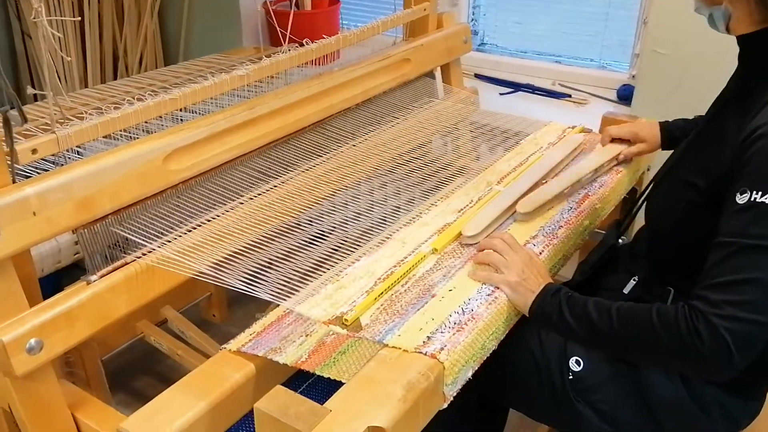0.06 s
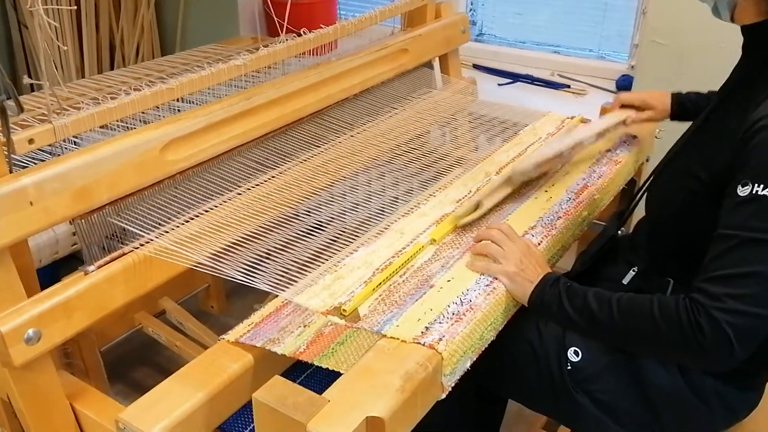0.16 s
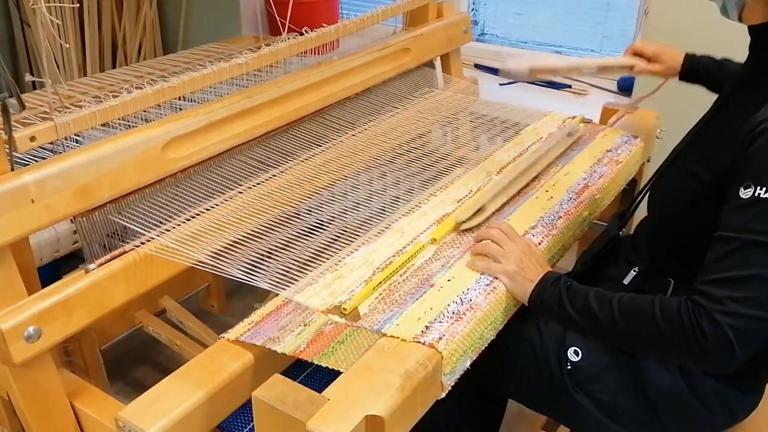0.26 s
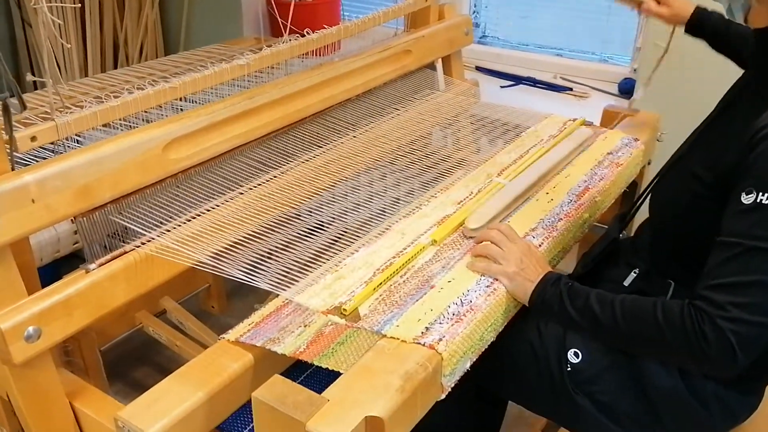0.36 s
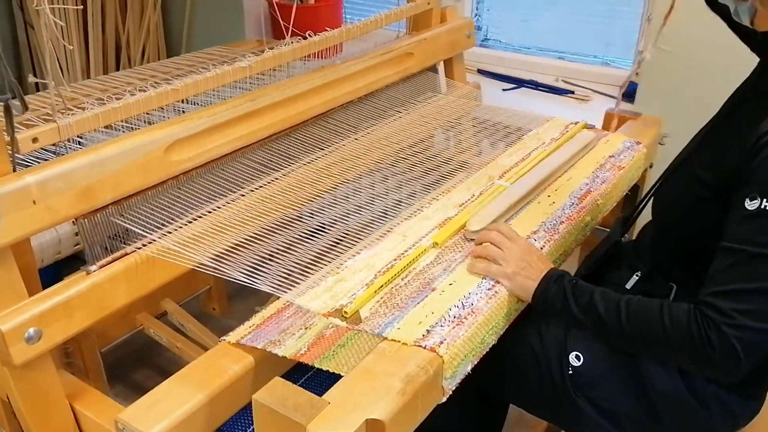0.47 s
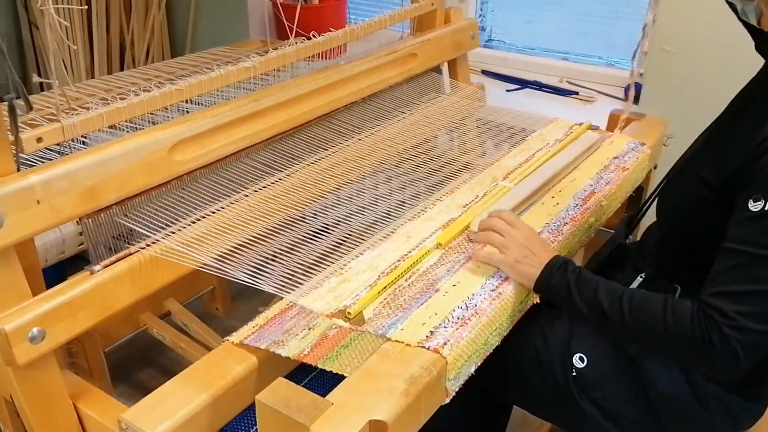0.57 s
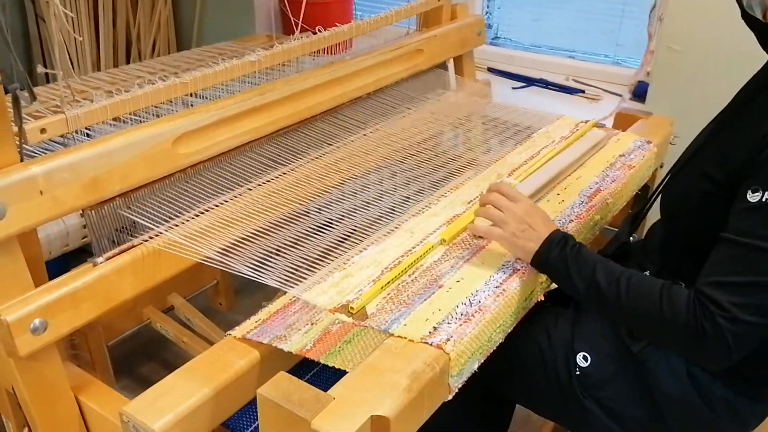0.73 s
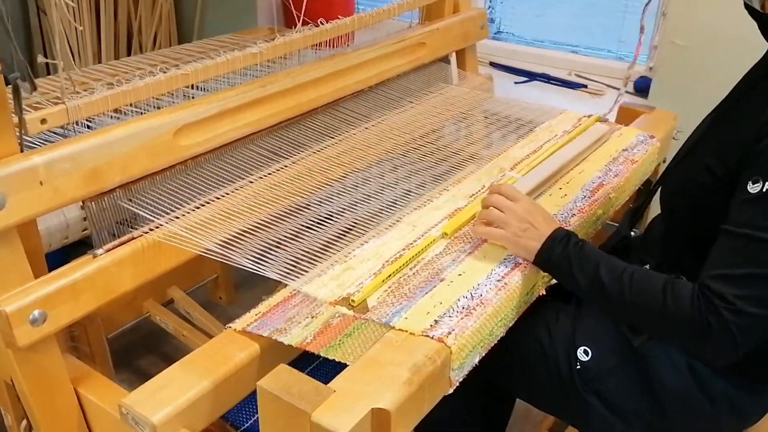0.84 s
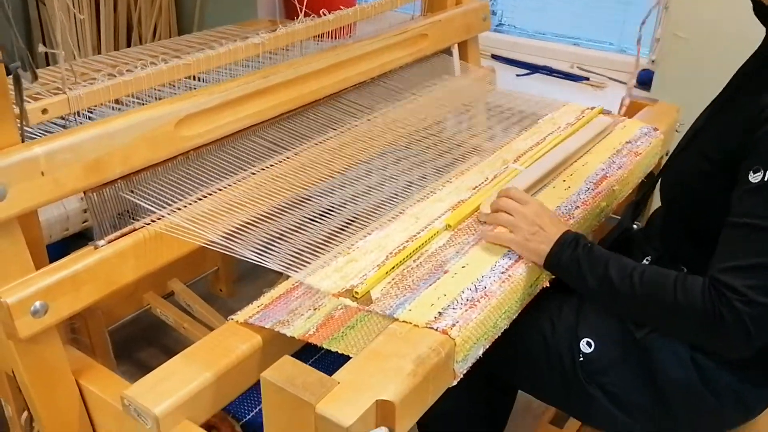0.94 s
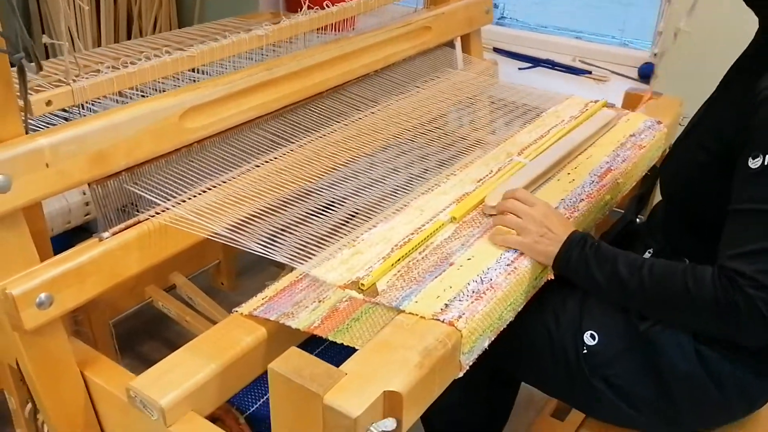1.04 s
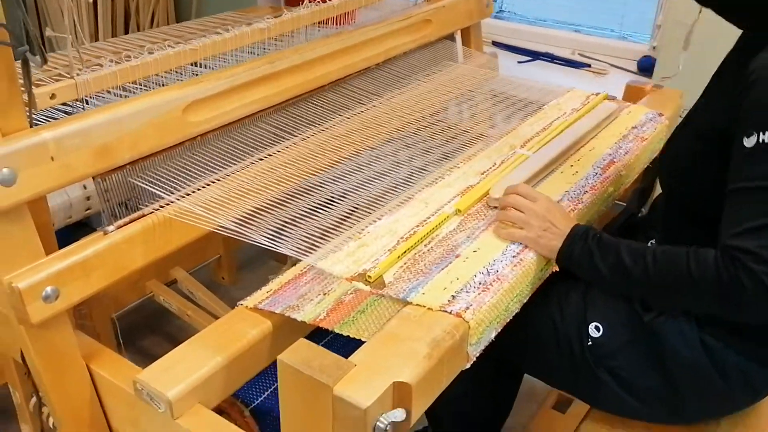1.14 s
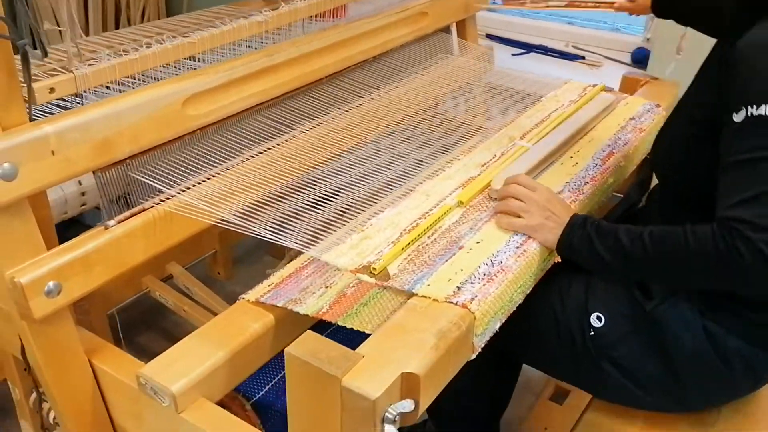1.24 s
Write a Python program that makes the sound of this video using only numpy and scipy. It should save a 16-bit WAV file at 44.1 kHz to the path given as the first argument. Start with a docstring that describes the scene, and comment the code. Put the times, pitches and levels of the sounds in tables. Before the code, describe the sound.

A wooden stick shuttle lands on a hand loom with a sharp, briefly ringing clatter. The heavy loom gives a few dull thumps, taut threads tick, and cloth slides softly over the weave in a quiet, slightly echoing workroom.

```python
"""A dull thump, then a sharp clattering knock: a stick shuttle is put down on a wooden hand loom.
The stick lands in a quick run of contacts and rings, and the heavy frame answers with more thumps.
Taut threads tick, cloth slides over the woven rug with a soft rustle, and a low hum swells near
the end. Knocks, thumps and ticks echo briefly in the workroom, over a bed of quiet air."""
import sys
import numpy as np
from scipy import signal
from scipy.fft import rfft, irfft
from scipy.io import wavfile

SR = 44100
rng = np.random.default_rng(int(sys.argv[2]) if len(sys.argv) > 2 else 0)


def unload_audio(sound):
    """Save the sound as a 16-bit wav file, at the path given as the first command line argument."""
    columns = np.transpose(np.atleast_2d(sound))
    # keep every value between -1 and 1, then stretch to whole-number steps
    steps = np.round(np.clip(columns, -1, 1) * 32767)
    wavfile.write(sys.argv[1], SR, steps.astype(np.int16))


N = 57330
EDGE_HZ = 7520  # treble cutoff


def amp(db):
    return 10 ** (np.asarray(db) / 20)


def unit_rms(x):
    return x / np.sqrt(np.mean(x ** 2) + 1e-20)


def at_hz(points, hz):
    """Reads a table on a log-frequency axis."""
    f, value = np.transpose(points)
    return np.interp(np.log(hz + 1), np.log(f + 1), value)


def fader(points):
    """Draws straight ramps between timed points."""
    return np.interp(np.arange(N) / SR, *np.transpose(points))


def add(mix, s, sound):
    """Mixes a sound in at s seconds."""
    part = mix[round(s * SR):][:len(sound)]
    part += sound[:len(part)]


def coloured(x, spectrum):
    """EQs a steady sound and rolls off its top, at rms 1."""
    hz = np.fft.rfftfreq(N, 1 / SR)
    return unit_rms(irfft(rfft(x) * amp(at_hz(spectrum, hz)) / (1 + (hz / EDGE_HZ) ** 20), N))


def whitened(x):
    """Flattens the spectrum and keeps the timing."""
    return irfft(np.exp(1j * np.angle(rfft(x))), len(x))


def drift(rate_hz):
    """Smooth random modulation up to about rate_hz, at rms 1."""
    lowpass = np.exp(-(np.fft.rfftfreq(N, 1 / SR) / rate_hz) ** 2)
    return unit_rms(irfft(rfft(rng.standard_normal(N)) * lowpass, N))


def burst(spectrum, t60, tilt_db, pivot_hz, size=8192):
    """One contact: fast-dying noise through a minimum-phase EQ, tilted by tilt_db per octave."""
    t, hz = np.arange(size) / SR, abs(np.fft.fftfreq(size, 1 / SR))
    scatter = rng.standard_normal(size)
    for _ in range(3):
        scatter = whitened(scatter * amp(-60 * t / t60))
    octaves = np.log2(np.clip(hz / pivot_hz, 1 / 4, 4))
    log_gain = np.log(amp(at_hz(spectrum, hz) + tilt_db * octaves))
    colour = np.fft.ifft(np.exp(np.conj(signal.hilbert(log_gain)))).real
    return signal.fftconvolve(scatter[:size // 2], colour[:size // 2])


# Reverb decay of the workroom (frequency [Hz], t60 [s])
ROOM_DECAY = [(100, 0.8), (400, 0.4), (1000, 0.57), (2000, 0.43), (2650, 0.44), (3300, 0.43), (5000, 0.35),
              (7500, .33)]

def room(x, build_s=.008):
    """Reverb return: scattered reflections, each band dying at its own speed."""
    taps = np.zeros(SR)
    slots = np.arange(0, SR - 10, 10)
    taps[slots + rng.integers(0, 10, len(slots))] = rng.choice([-1., 1.], len(slots))
    hz, t, bands = signal.stft(whitened(taps), SR, nperseg=256)
    tail = signal.istft(bands * amp(-60 * t / at_hz(ROOM_DECAY, hz)[:, None]), SR)[1]
    tail *= np.minimum(np.arange(len(tail)) / SR / build_s, 1)
    return signal.fftconvolve(x, tail / np.linalg.norm(tail))[:N]


# Tone of the room air (frequency [Hz], relative level [dB])
AIR_EQ = [(25, -6.5), (60, -2), (110, -2.5), (190, -8.5), (340, -9), (700, -16), (1500, -20), (3000, -22.5),
          (6000, -23.5), (7500, -27)]

def air(level_db=-66):
    """Room air: a steady bed of dark noise."""
    return amp(level_db) * coloured(rng.standard_normal(N), AIR_EQ)


# Swell of the hum (time [s], level [dB])
HUM_FADER = [(.45, -81), (.64, -59), (.76, -67.5), (.93, -63.5), (1.03, -56.5), (1.15, -56), (1.3, -54)]

def hum(pitch_hz=101.5, waver=.006):
    """A low sine tone with a slight waver in pitch."""
    cycles = np.cumsum(pitch_hz * (1 + waver * drift(rate_hz=4.7))) / SR
    return amp(fader(HUM_FADER)) * unit_rms(np.sin(2 * np.pi * cycles))


# Stroke of the sliding cloth (time [s], level [dB])
CLOTH_FADER = [(0, -69), (.13, -79.5), (.65, -82.5), (.705, -63), (.75, -61.5), (.80, -53), (.86, -48.5),
               (.905, -46.5), (.95, -51.5), (.99, -55.5), (1.06, -55.5), (1.125, -64.5), (1.165, -66.5),
               (1.205, -62.5), (1.3, -80)]
# Rustle under light and under firm pressure (frequency [Hz], relative level [dB])
LIGHT_RUB_EQ = [(100, 5.5), (190, 10.5), (330, -8.5), (600, -24.5), (1200, -7), (1800, -6), (3000, -1.5),
                (4200, -1), (5000, -5), (6400, -0.5), (7400, -3)]
FIRM_RUB_EQ = [(60, 3), (120, 7.5), (185, 9.5), (300, 1), (420, -7.5), (650, -1.5), (1100, -1.5),
               (1700, -4.5), (3000, -0.5), (4200, -0.5), (5000, 0.5), (6200, 4), (7400, -0.5)]

def cloth(snags_per_s=2200, flutter_db=0.9):
    """Fibres rub and snag; the mids fill out as the stroke presses harder."""
    level_db = fader(CLOTH_FADER)
    pressure = np.exp((level_db - level_db.max()) / 14)  # 1 at the peak of the stroke
    snags = (rng.random(N) < snags_per_s / SR) * rng.choice([-1, 1], N)
    snags = snags * amp(3 * np.minimum(rng.exponential(1, N), 4))  # a few catch harder
    rub = rng.standard_normal(N) + amp(-10) * unit_rms(snags)
    light = amp(0.5) * coloured(rub, LIGHT_RUB_EQ)
    firm = amp(1) * coloured(rub, FIRM_RUB_EQ)
    rustle = (1 - pressure) * light + pressure * firm
    return amp(level_db + flutter_db * drift(rate_hz=45)) * rustle


# Cues for the thread ticks (time [s], level [dB])
TICK_CUES = [(0.215, -42), (.596, -34.5), (1.22, -36)]
# Bright tone of one tick (frequency [Hz], level [dB])
TICK_EQ = [(300, -24.5), (1500, -13.5), (4000, -8.5), (6000, 5), (7400, 0.5)]

def threads(wet_db=-2.5):
    """Taut threads flick as they are touched."""
    ticks = np.zeros(N)
    for s, db in TICK_CUES:
        add(ticks, s, amp(db) * burst(TICK_EQ, t60=.012, tilt_db=0, pivot_hz=3000))
    return ticks + amp(wet_db) * room(ticks)


# Soft blows on the frame (time [s], relative level [dB], brightness [dB/octave])
THUMP_CUES = [(.136, -15.5, -5), (0.245, -15, -0.5), (.318, -12.5, 8), (0.341, -16, -6.5), (0.4308, -1, 0),
              (.448, -3.5, -1.5), (.480, -11, 3), (.536, -8, -1.5), (.584, -20, -4), (0.613, -24, 1.5),
              (.686, -32.5, 6.5), (.760, -21.5, -1), (.953, -20, 4), (1.205, -23, 5.5)]
# Bass-heavy tone of one blow (frequency [Hz], relative level [dB])
THUMP_EQ = [(30, -25), (70, -7), (115, -3), (175, -3.5), (250, -11), (340, -4.5), (490, -12.5),
            (750, -28.5), (1500, -46), (6000, -63.5)]

def frame(thump_db=7, wet_db=-0.5, beam_hz=122.2, sway_hz=37.3):
    """Blows thud through the cloth into the frame and swing its beam."""
    blows, low_end, t = np.zeros(N), np.zeros(N), np.arange(SR) / SR
    beam_envelope = np.minimum(t / 0.0046, 1) * amp(-30.5 - 60 * t / 0.06)
    beam = -beam_envelope * np.sin(2 * np.pi * beam_hz * t)
    for s, db, tilt_db in THUMP_CUES:
        add(blows, s, amp(db + thump_db) * burst(THUMP_EQ, t60=0.038, tilt_db=tilt_db, pivot_hz=159))
        add(low_end, s, amp(db) * beam)
    # a faint, deep sway swells around the loudest thump and dies away
    sway_envelope = np.minimum(t / 0.074, 1) ** 2 * amp(-40.5 - 60 * t / 0.68)
    add(low_end, 0.39, sway_envelope * np.sin(2 * np.pi * sway_hz * t))
    return blows + amp(wet_db) * room(blows) + low_end


# Contacts of the shuttle (time [s], relative level [dB], brightness [dB/octave])
CLATTER_CUES = [(0.2403, -7, 4.5), (0.242, 0, 5.5), (0.2438, 2, -3), (.2470, -4, 3), (0.2491, 1, 0.5),
                (0.2518, 0.5, -0.5), (0.2625, -9, -10), (0.2775, -26, -5), (0.297, -12.5, 2)]
# Sharp tone of one contact (frequency [Hz], relative level [dB])
CRACK_EQ = [(80, -18.5), (400, -20), (820, -21), (1020, -13.5), (1300, -8), (1560, -1.5), (1780, -8.5),
            (2250, -4), (2650, 7.5), (3020, -9), (3430, 1), (3800, -3.5), (4600, 3), (5000, -2.5),
            (5450, -2.5), (6000, -14), (7100, -12.5), (7700, -26.5)]
# Modes of the stick (frequency [Hz], relative tip level [dB], relative far-end level [dB], t60 [s])
STICK_MODES = [(552, -16.5, -35, 0.47), (628, -50, -19.5, 0.54), (645, -39, -24, 0.49),
               (1008, -16, -17.5, 0.3), (1398, -7.5, -35, 0.071), (1491, -13.5, -10, 0.33),
               (1599.5, -1.5, -13, 0.16), (2128, -17, -26, 0.34), (2410, -12.5, -24.5, 0.41),
               (2598, -6, -15.5, 0.38), (2707, -14, -17, 0.35), (2660, -4.5, -20.5, 0.39),
               (2818, -4, -19, 0.24), (3410, -10, -13, 0.21), (4143, 7.5, -29, 0.051),
               (4694, -4.5, -20, 0.15)]

def shuttle(crack_db=-1.5, wet_db=-0.5, ring_db=-30.5, attack_s=0.0032):
    """The stick clatters down, ringing as its tip lands and again as its far end settles."""
    cracks, ring, t = np.zeros(N), np.zeros(N), np.arange(SR) / SR
    for s, db, tilt_db in CLATTER_CUES:
        crack = amp(crack_db + db) * burst(CRACK_EQ, t60=0.011, tilt_db=tilt_db, pivot_hz=2890)
        add(cracks, s, crack)
        add(cracks, s, amp(wet_db) * room(crack))
    land_s, settle_s = CLATTER_CUES[0][0], .293
    for hz, tip_db, end_db, t60 in STICK_MODES:
        for s, db in (land_s, tip_db), (settle_s, end_db):
            envelope = np.minimum(t / attack_s, 1) * amp(ring_db + db - 60 * t / t60)
            add(ring, s, envelope * np.sin(2 * np.pi * (hz * t + rng.random())))
    return cracks + ring


def scene():
    """Mono mix of the loom over quiet room air."""
    return (air() + shuttle() + frame() + threads() + cloth() + hum())[None]


def record(dry):
    """A steep low-pass on the whole mix."""
    lowpass = signal.firwin(171, EDGE_HZ, window=("kaiser", 7), fs=SR)
    return signal.oaconvolve(dry, lowpass[None], "same")


dry = scene()
out = record(dry)
unload_audio(out)
```